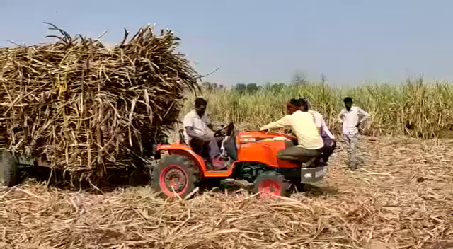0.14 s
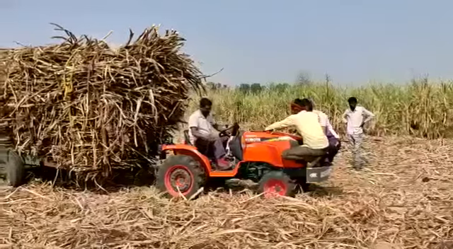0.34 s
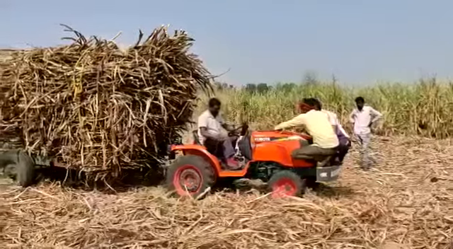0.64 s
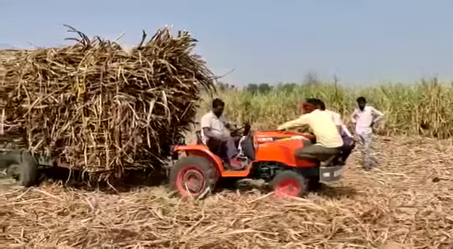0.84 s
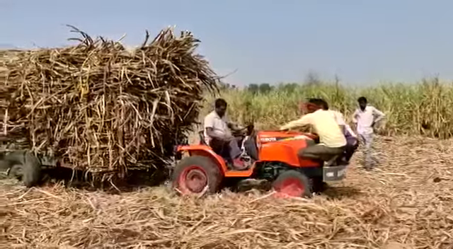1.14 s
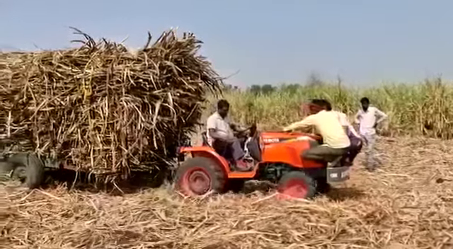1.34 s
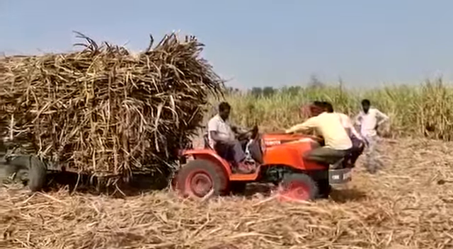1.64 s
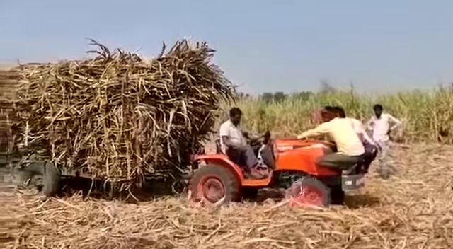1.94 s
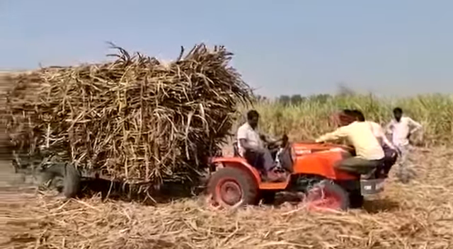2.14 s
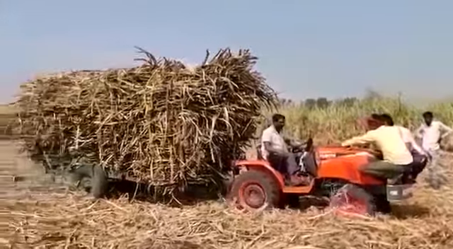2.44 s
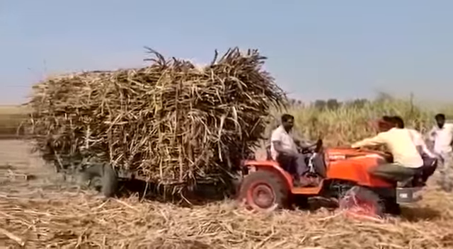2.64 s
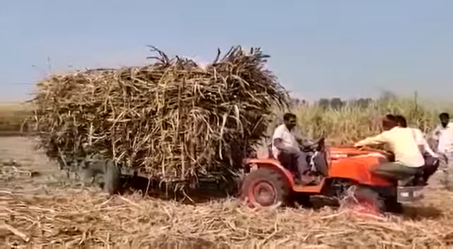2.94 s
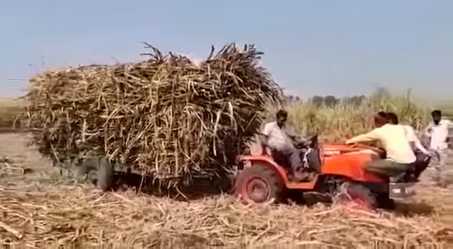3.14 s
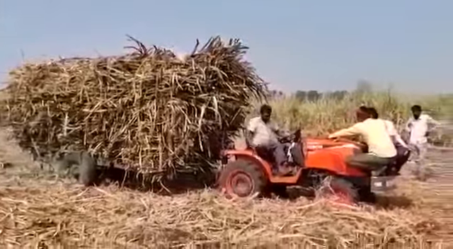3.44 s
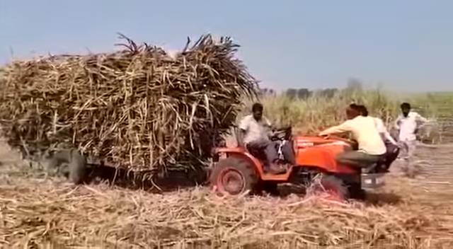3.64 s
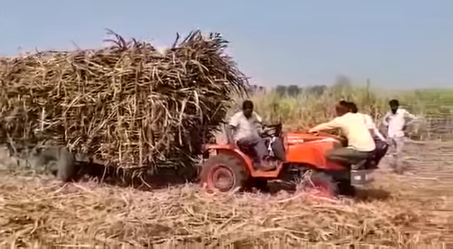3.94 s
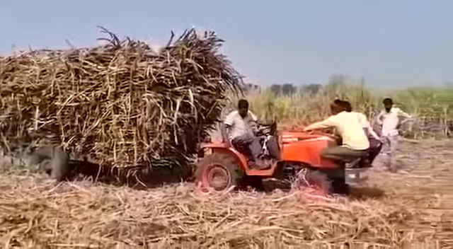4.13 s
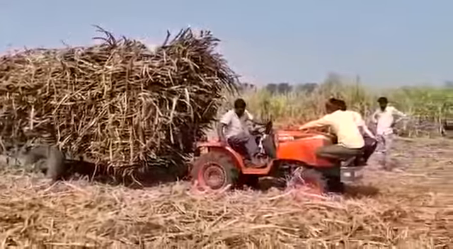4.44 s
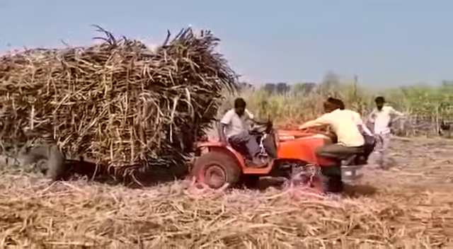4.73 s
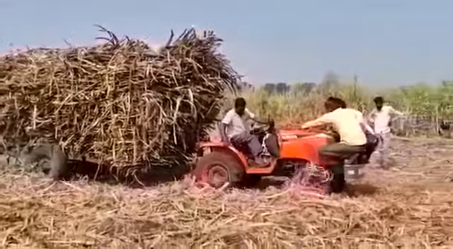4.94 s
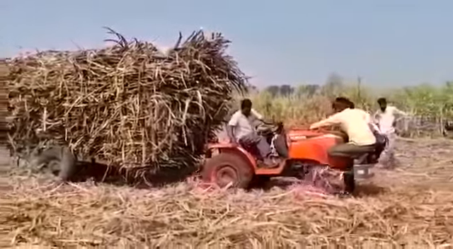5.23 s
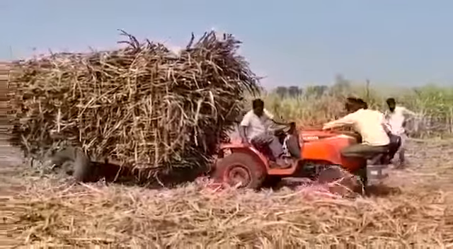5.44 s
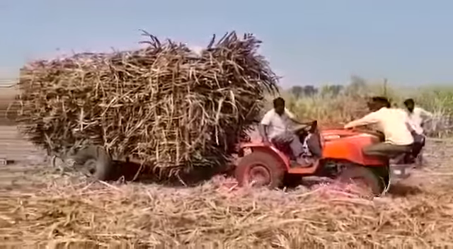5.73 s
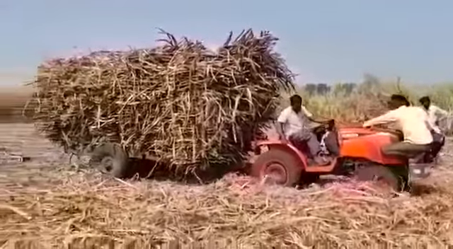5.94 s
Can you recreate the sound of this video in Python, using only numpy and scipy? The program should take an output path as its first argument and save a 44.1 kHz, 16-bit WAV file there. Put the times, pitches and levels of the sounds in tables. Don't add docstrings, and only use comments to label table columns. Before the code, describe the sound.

Throaty three-cylinder tractor engine strains in a dry field, whining near 1 kHz, drops to slow ticking idle, then surges back into a second loaded pull.

```python
import sys
import numpy as np
from scipy import signal
from scipy.fft import rfft, irfft
from scipy.io import wavfile
from scipy.ndimage import uniform_filter1d

SR = 44100
rng = np.random.default_rng(int(sys.argv[2]) if len(sys.argv) > 2 else 0)


def store_pcm(level_fs):
    pcm = np.round(np.clip(level_fs, -1, 1) * 32767).astype(np.int16)
    wavfile.write(sys.argv[1], SR, np.atleast_2d(pcm).T)


def magnitude_from_level(level_db):
    exponent = np.asarray(level_db, float) / 20
    return 10 ** exponent


N = 268128
T = np.arange(N) / SR
PULL_1_S, PULL_2_S = (.57, 2.15), (4.66, 6.2)
COAST_S = 2.04, 3.72


def read(points, hz, end=None):
    f, value = np.transpose(points)
    return np.interp(np.log(hz + 1), np.log(f + 1), value, end, end)


def curve(rows):
    s, value = np.transpose(rows)
    return np.interp(T, s, value)


def during(start, end, blur):
    return uniform_filter1d(1. * (T > start) * (T < end), size=blur, mode="nearest")


def steady(x, window_s=0.34):
    size = int(window_s * SR)
    power = (x ** 2).reshape(-1, N).mean(0)
    power = uniform_filter1d(uniform_filter1d(power, size), size)
    return x / np.sqrt(abs(power) + 1e-14)


def wobble(per_s):
    knots = rng.standard_normal(int(T[-1] * 400) + 2)
    knots = signal.lfilter([1], [1, -np.exp(-2 * np.pi * per_s / 400)], knots)
    return np.interp(T, np.arange(len(knots)) / 400, knots / knots.std())


def noise(spectrum, patchy_db):
    frames, hz = N // 128 + 5, np.fft.rfftfreq(N, 1 / SR)
    a, b, c, d, patches = rng.standard_normal((frames, 257, 5)).T
    patches = uniform_filter1d(uniform_filter1d(patches, size=6, axis=0), size=16, axis=1)
    z = np.array([a + 1j * b, c + 1j * d]) * magnitude_from_level(patchy_db * patches / patches.std())
    x = signal.istft(z, nperseg=512, noverlap=384)[1][:, :N]
    x = irfft(rfft(x) * magnitude_from_level(read(spectrum, hz, -85.5)), N)
    return x / x.std()


# time in seconds, firings per second.
ENGINE_SPEED = [(0, 42.7), (.2, 46.6), (.6, 49.7), (1.5, 63.2), (1.7, 66), (2.0, 64.9), (2.09, 59.2),
                (2.3, 52.3), (3, 29.4), (3.25, 24.5), (3.66, 22.2), (3.8, 26.5), (4.25, 51.2), (4.4, 52.6),
                (4.65, 50.4), (5, 51.1), (5.3, 49.1), (6.08, 51.3)]


def engine_speed():
    return uniform_filter1d(curve(ENGINE_SPEED), int(.04 * SR), mode="nearest")


# time in seconds, level of the exhaust bark in dB.
FUEL_BURNT = [(0, -32), (.05, -26), (.69, -23), (1.27, -23), (2.0, -23.5), (2.04, -31), (2.13, -25),
              (2.49, -36), (2.6, -30.5), (3.3, -46.5), (3.72, -41), (3.77, -29), (4.2, -25), (4.31, -22),
              (4.35, -28), (4.55, -30.5), (4.6, -23), (6.08, -23)]


def fuel_burnt():
    return curve(FUEL_BURNT)


# time in seconds, level of the hiss in dB.
METAL_STRAIN = [(0, -31.5), (.45, -32.5), (.6, -28.5), (1.1, -26.5), (1.75, -26), (2.12, -29.5),
                (2.18, -35), (3.06, -40.5), (3.12, -37), (3.27, -41), (3.7, -43.5), (3.75, -39.5),
                (4.23, -30.5), (4.38, -33.5), (4.62, -29), (4.72, -25), (4.85, -26.5), (6.08, -27.5)]


def metal_strain():
    return curve(METAL_STRAIN)


# frequency in Hz, level in dB per Hz.
PIPE_COLOUR = [(60, -20), (110, -7.5), (150, -11), (178, 5), (200, -1), (232, 3.5), (255, 4), (275, -6),
               (300, -8.5), (335, -18.5), (420, -21), (600, -24.5), (900, -10), (1300, -61)]
# level at full fuel in dB, dB per dB of fuel, change when coasting in dB.
LOW_TONES = [(-33.5, 0.3, -0.5), (-34, 1, -4), (-30.5, 0.97, 2.2)]
NO_LOAD_DB = [-2, -1, -5]
# frequency in Hz, level in dB.
TAILPIPE_COLOUR = [(22, -23), (30, -4.5), (48, -0.2), (100, 0), (140, -0.5), (160, 0.8), (183, 6.5),
                   (200, -3)]
# frequency in Hz, change in dB.
COOL_PIPE = [(30, 4), (60, 2.5), (75, -8), (120, -10.5), (140, 1.5), (170, 3.5)]


def exhaust(hz, turns, bark_db):
    fuel = bark_db + 23
    coasting = during(*COAST_S, blur=1500)
    free = during(-1, PULL_1_S[0], blur=3000) + during(COAST_S[1], PULL_2_S[0], blur=3000)
    warmth = 1 + 0.011 * (uniform_filter1d(bark_db, size=9000) + 24.5)

    def puffs(k):
        return np.cos(2 * np.pi * k * turns - .6 * k ** 2)

    upper = np.zeros(N)
    for third in range(8, 43):
        k = third / 3
        line_db = -15 if third % 3 else -99 * (k < 4)
        level_db = read(PIPE_COLOUR, k * hz / warmth) + line_db + 3.07 * wobble(per_s=5.9)
        upper += magnitude_from_level(level_db) * puffs(k)
    swirl = noise(PIPE_COLOUR, patchy_db=-1.8) * (2.1 + np.cos(2 * np.pi * turns))
    bark = steady(upper, 0.021) + magnitude_from_level(-9.5) * steady(swirl)

    tones = np.zeros(N)
    for k, (db, share, coast_db) in enumerate(LOW_TONES, 1):
        level_db = db + share * fuel + read(TAILPIPE_COLOUR, k * hz) + 2.1 * wobble(per_s=51)
        level_db += (coast_db + read(COOL_PIPE, k * hz)) * coasting + NO_LOAD_DB[k - 1] * free
        tones += magnitude_from_level(level_db) * puffs(k)
    return np.sqrt(2) * tones + magnitude_from_level(bark_db - 0.5) * bark


# frequency in Hz, level in dB.
GEARBOX_COLOUR = [(600, -13.5), (800, -12), (900, -1), (990, 0.5), (1095, -4.5), (1125, -16), (1200, -6.5),
                  (1238, -19)]
# frequency in Hz, level in dB.
LID_COLOUR = [(1250, -7), (1450, 3), (1570, -2.5), (1690, 0), (1850, -9), (2000, -8), (2100, 4)]


def gears(hz, start, end, meshes, waver_db):
    engaged = during(start, end, blur=1500)
    turns = np.cumsum(hz * (1 + 0.0024 * wobble(per_s=59))) / SR
    out = np.zeros(N)
    for ratio, db in meshes:
        through_casing = ratio < 1.2 or ratio * hz.max() < 1200
        level_db = db + read(GEARBOX_COLOUR if through_casing else LID_COLOUR, ratio * hz)
        level_db += waver_db * (.12 if ratio == 1 else ratio) * wobble(per_s=3.51)
        level_db += 0.94 * wobble(per_s=51)
        out += magnitude_from_level(level_db) * np.sin(2 * np.pi * (ratio * turns + rng.random()))
    return np.sqrt(2) * engaged * out


def shaft(hz, start, end, teeth):
    since, left = abs(T - start), abs(end - T)
    slip = 0.01193 * np.exp(-since / 0.1992) + 0.046 * np.exp(-left / 0.0512)
    chatter = .16 * wobble(per_s=155) * np.exp(-np.minimum(since, left) / .04)
    return teeth * hz * (1 - slip + chatter), start, end


# ratio to the main mesh, level in dB.
FIRST_PULL_MESHES = [(1, -21), (1.7, -50), (.75, -28), (.667, -31), (1.333, -45.5), (1.25, -51),
                     (1.733, -46)]
# ratio to the main mesh, level in dB.
SECOND_PULL_MESHES = [(1, -25), (1.078, -35), (1.365, -40), (.809, -23.5), (1.618, -44.5), (1.887, -51)]
# ratio to the main mesh, level in dB.
INPUT_MESHES = [(1, -29), (1.5, -34)]


def drive_whine(hz, strain):
    whine = gears(*shaft(hz, *PULL_1_S, teeth=18.6), FIRST_PULL_MESHES, waver_db=2.0)
    whine += gears(*shaft(hz, *PULL_2_S, teeth=19.85), SECOND_PULL_MESHES, waver_db=2.0)
    whine *= magnitude_from_level(0.53 * strain)
    return whine + gears(*shaft(hz, 4.22, 6.2, teeth=11.4), INPUT_MESHES, waver_db=3.0)


# time in seconds, tooth meshes in Hz.
WHEEL_SPIN = [(5.85, 720), (5.89, 742), (6.04, 775), (6.1, 800)]


def wheel_spin():
    start, end = WHEEL_SPIN[0][0], WHEEL_SPIN[-1][0]
    meshes = [(1, -18), (2, -38.5), (4.42, -52.5)]  # ratio, dB
    return gears(curve(WHEEL_SPIN), start, end, meshes, waver_db=1.1)


# time in seconds, extra roar in dB.
CASING_GRINDS = [
    (.585, 3),
    (2.09, 4.3),
    (3.13, 6.7),
    (4.72, 2),
]


def roar_level(strain):
    roar_db = -24.5 + 1.236 * strain + 0.75 * wobble(per_s=8.4)
    return roar_db + sum(db * np.exp(-((T - s) / .035) ** 2) for s, db in CASING_GRINDS)


def knock_level(strain, fuel):
    knock_db = -34 + 0.63 * strain + 0.21 * fuel + 1.3 * wobble(per_s=5.5)
    return knock_db + 2.5 * during(COAST_S[1], PULL_2_S[0], blur=5000)


# frequency in Hz, level in dB per Hz.
CASING_COLOUR = [(190, -43), (320, -2.5), (376, -11.5), (516, -7.5), (569, -9.5), (619, -10.5), (801, -0.5),
                 (889, -1.5), (966, 4), (1200, -10), (1500, -6), (1950, -17.5), (3300, -120)]
# frequency in Hz, level in dB per Hz.
BLOCK_COLOUR = [(710, -31.5), (1200, 1), (1310, -22), (1660, 1), (1970, 0.5), (2080, 0.5), (2160, -12),
                (2380, -7), (2600, -10), (3380, -11.5), (5720, -120)]
# frequency in Hz, level in dB per Hz.
HISS_COLOUR = [(1240, -21), (2100, -12), (2200, -8.5), (2410, -6), (2690, -9), (3280, -9.5), (3580, -7.5),
               (4080, -6.5), (5050, -5.5), (6730, -4), (7670, 1.5), (9350, -5.5), (9750, -11.5),
               (10800, -32), (14000, -77), (22000, -120)]


def block(hz, turns, roar_db, knock_db, hiss_db):
    slow = np.clip((48 - hz) / 26, .1, 1)
    burn = np.exp(-((turns + 0.25) % 1) / .22)
    uneven = magnitude_from_level(2.0 * rng.standard_normal(int(turns[-1]) + 2))[(turns + .3).astype(int)]
    chop = slow * burn * uneven
    flutter_db = 0.99 * wobble(per_s=78)
    roar = noise(CASING_COLOUR, patchy_db=1.5) * (1 + 1.4 * chop) * magnitude_from_level(0.46 * flutter_db)
    knock = noise(BLOCK_COLOUR, patchy_db=1.5) * (1 + 1.9 * chop) * magnitude_from_level(2.0 * flutter_db)
    hiss = noise(HISS_COLOUR, patchy_db=1.5) * (1 + 1.0 * chop) * magnitude_from_level(flutter_db)
    out = magnitude_from_level(roar_db - 5.5) * steady(roar, 0.096)
    out += magnitude_from_level(knock_db - 1.5) * steady(knock, 0.23)
    return out + magnitude_from_level(hiss_db + 0.58) * steady(hiss, 0.04)


def injectors(hz, turns, knock_db):
    at = np.flatnonzero(np.diff(np.floor(turns + 0.33)))
    clicks, t = np.zeros(N), np.arange(2000) / SR
    clicks[at] = magnitude_from_level(1.0 * rng.standard_normal(len(at)))
    ring = magnitude_from_level(-60 * t / 0.1) * np.sin(2 * np.pi * 2030 * t) * (1 - np.exp(-t / 0.0011))
    idling = np.clip((45 - hz) / 18, 0, 1) * (T > 3.2)
    return magnitude_from_level(knock_db + 6.5) * idling * signal.oaconvolve(clicks, ring)[:N]


# frequency in Hz, level in dB.
HIGH_TONES = [(3693, -54), (4290, -53), (4899, -52), (6406, -47)]


def high_tones(hiss_db):
    tones = np.zeros(N)
    for hz, db in HIGH_TONES:
        turns = np.cumsum(hz + 14 * wobble(per_s=8.1)) / SR
        tones += magnitude_from_level(db - 2.5 + 7.4 * wobble(per_s=6.3)) * np.sin(2 * np.pi * turns)
    return magnitude_from_level(hiss_db + 30) * tones


# time in seconds, peak in dB, low ring in dB, ring in Hz.
CLUNK_BLOWS = [(0.5514, -25, -16, 900), (0.5974, -35.5, -34, 961), (0.9163, -3, -21, 1060),
               (1.1774, -12.5, -21, 1118), (2.1388, -30, -19, 1012), (2.2786, -29, -21, 967),
               (3.0983, -19, -32, 956), (3.1194, -29, -22, 940), (3.1444, -26.5, -31, 840),
               (3.1614, -28, -26, 910), (3.1914, -34, -37, 960), (3.23, -25, -27, 1009),
               (3.2477, -60, -28, 960), (3.3326, -18, -50, 1000), (3.7414, -19.5, -29, 980),
               (4.6699, -14.5, -11, 988), (4.7137, -6.5, -12, 851), (4.7391, -38.5, -26, 960),
               (4.8294, -22.5, -25, 943)]


def clunks():
    out, t = np.zeros((2, N + SR)), np.arange(4000) / SR
    rattle = noise(HISS_COLOUR, patchy_db=3)
    for s, db, ring_db, hz in CLUNK_BLOWS:
        at = round(s * SR)
        ring = magnitude_from_level(ring_db - 60 * t / 0.047) * np.sin(2 * np.pi * hz * t) * (1 - np.exp(-t / 0.0025))
        out[:, at:at + len(t)] += ring + magnitude_from_level(db - 17 - 60 * t / 0.18) * rattle[:, at:at + len(t)]
    return out[:, :N]


# time in seconds, peak in dB.
SHARP_CRACKS = [(0.9164, -11.5), (1.179, -16.5), (4.8294, -17), (5.046, -9)]


def cracks():
    out, t = np.zeros(N + SR), np.arange(4000) / SR
    for s, db in SHARP_CRACKS:
        at = round(s * SR)
        ring = np.sin(2 * np.pi * 8000 * t) * (1 - np.exp(-t * 6000))
        out[at:at + len(t)] += magnitude_from_level(db - 1 - 60 * t / .01) * ring
    return out[:N]


# frequency in Hz, level in dB per Hz.
FIELD_COLOUR = [(12, -30.5), (20, -4.5), (70, -7.5), (113, -16), (176, -0.5), (310, -8), (368, -13),
                (574, -22.5), (977, -19), (1200, -20), (1560, -21), (2640, -120)]


def field():
    return magnitude_from_level(-42) * noise(FIELD_COLOUR, patchy_db=0.5)


# frequency in Hz, likeness from 0 to 1.
LIKENESS = [(60, 0.94), (130, 1), (260, 0.98), (550, 1), (1140, 0.93), (2380, 0.44), (4970, 0.058),
            (10400, 0.27)]
# frequency in Hz, left over right in dB.
LEFT_OVER_RIGHT = [(60, 5), (330, 5), (690, 2.3), (1380, 1.6), (1720, -1.3), (2400, -1.7), (3450, 1.2),
                   (4500, -.7), (5800, -.1), (6550, -2.3), (7400, -10.5), (8270, -2.5), (9300, 6.6),
                   (10000, 7.5)]


def ports(near, far):
    hz = np.fft.rfftfreq(N, 1 / SR)
    same, tilt = np.clip(read(LIKENESS, hz), -1, 1), magnitude_from_level(read(LEFT_OVER_RIGHT, hz) / 2)
    left = rfft(near) * np.exp(2j * np.pi * np.maximum(hz - 1200, 0) * 4.46 / SR)
    right = same * rfft(near) + 1j * np.sqrt(1 - same ** 2) * rfft(far)
    mid = np.sqrt(tilt ** 2 + tilt ** -2 + 2 * same) / 2
    return irfft([left * tilt / mid, right / tilt / mid], N)


def scene():
    hz, bark_db, hiss_db = engine_speed(), fuel_burnt(), metal_strain()
    turns = np.cumsum(hz) / SR
    fuel, strain = bark_db + 23, hiss_db + 27
    knock_db = knock_level(strain, fuel)
    mix = exhaust(hz, turns, bark_db + 0.42 * wobble(per_s=14))
    mix += drive_whine(hz, strain) + wheel_spin()
    mix += block(hz, turns, roar_level(strain), knock_db, hiss_db + 0.74 * wobble(per_s=4))
    mix += injectors(hz, turns, knock_db) + high_tones(hiss_db)
    mix += clunks() + cracks() + field()
    return ports(*mix)


def band_limit(x):
    return signal.sosfilt(signal.butter(12, 10980, fs=SR, output="sos"), x)


def record(dry):
    mid_side = np.array([dry[0] + dry[1], dry[0] - dry[1]]) / 2
    hz, _, z = signal.stft(mid_side, SR, nperseg=2048, noverlap=1536)
    power = abs(z) ** 2
    around = uniform_filter1d(uniform_filter1d(power, size=60, axis=1), size=15, axis=2)
    band = uniform_filter1d(uniform_filter1d(power, size=8, axis=1), size=6, axis=2)
    thrift = read([(1900, 0.004), (2500, 0.29), (3500, 0.53), (5600, 0.62),
                   (7000, 0.083), (9000, 0.53), (10000, 0.44)], hz)[:, None]
    level_db = 10 * np.log10(around.sum((0, 1)) + 1e-12)
    thrift = thrift * np.clip(1 + 0.012 * (level_db.max() - 13 - level_db), .5, 1.6)
    strong_band = band.sum(0) > 1.27 * thrift * around.sum(0)
    strong_bin = power > .7 * thrift * around
    kept = z * strong_band * strong_bin
    mid, side = signal.istft(kept, SR, nperseg=2048, noverlap=1536)[1][:, :N]
    return band_limit(np.array([mid + side, mid - side]))


dry = scene()
out = record(dry)
store_pcm(out)
```